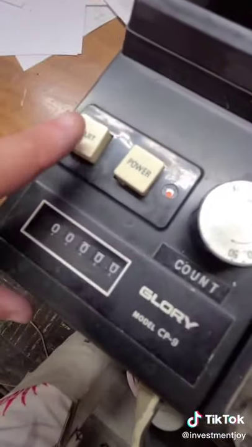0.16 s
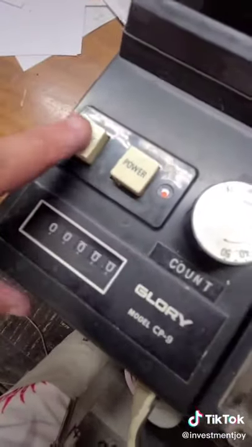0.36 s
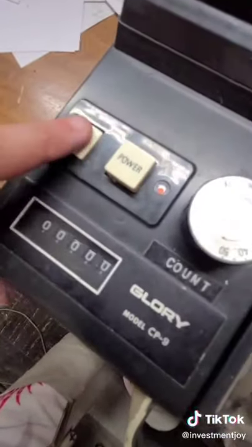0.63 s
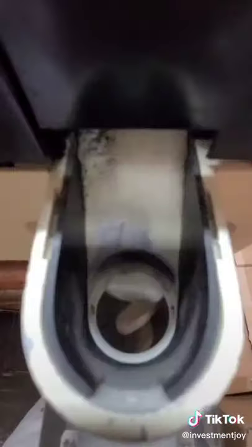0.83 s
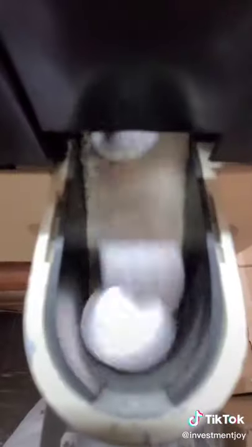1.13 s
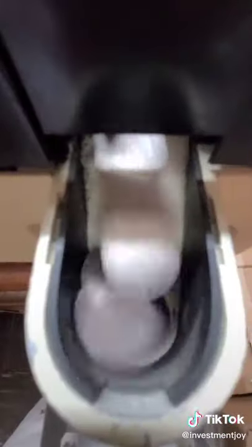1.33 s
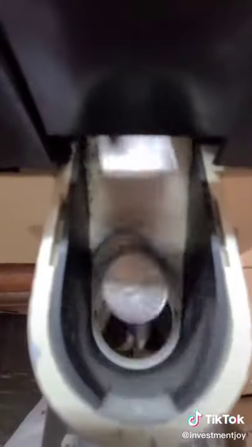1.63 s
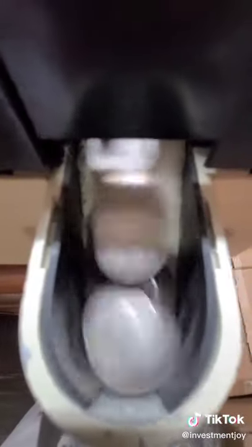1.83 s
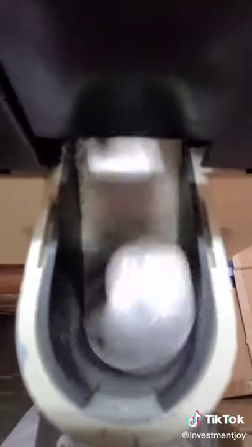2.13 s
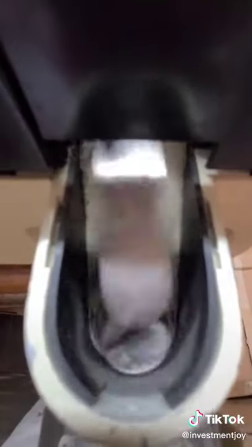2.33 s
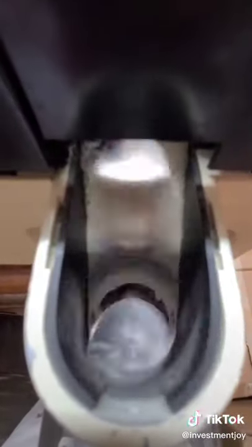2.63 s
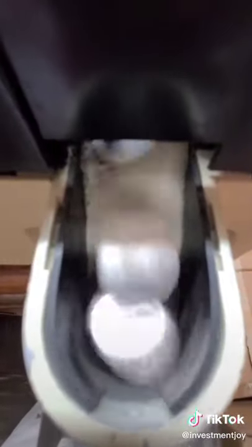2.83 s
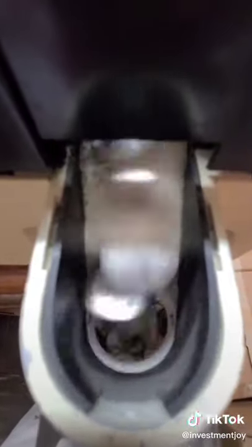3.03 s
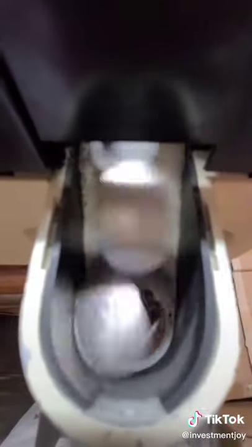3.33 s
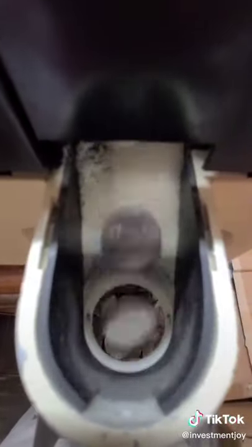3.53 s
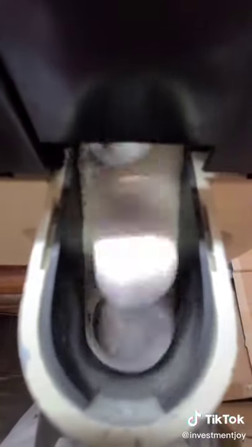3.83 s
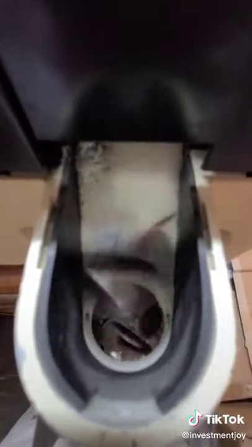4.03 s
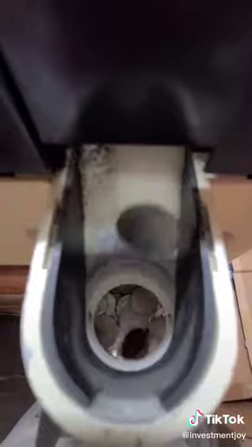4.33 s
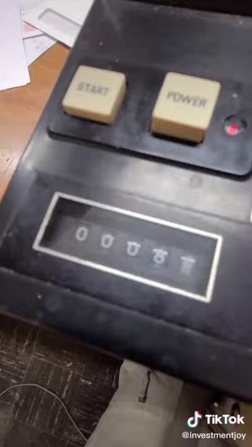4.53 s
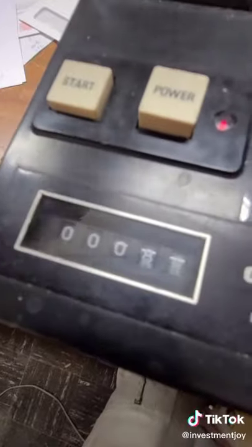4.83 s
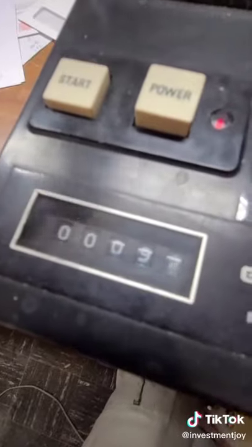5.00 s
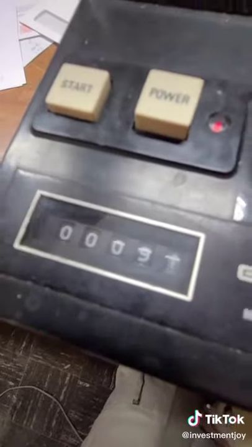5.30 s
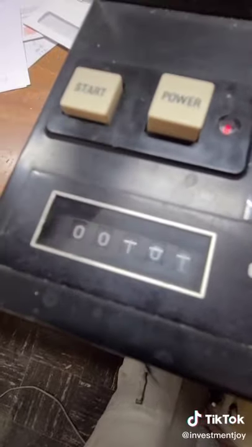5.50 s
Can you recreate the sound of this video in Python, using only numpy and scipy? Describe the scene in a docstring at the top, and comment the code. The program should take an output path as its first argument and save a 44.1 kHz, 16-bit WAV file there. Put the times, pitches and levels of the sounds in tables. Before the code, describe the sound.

Coin counter starting with a heavy clunk, followed by a dense, bright, unbroken clatter of coins, silvery ringing and quick hollow knocks.

```python
"""Quarters rattle and shimmer on a spinning disc, ring as they fly free, and knock and clink into a chute.
A button starts the coin counter: its clutch clunks, the motor growls upward, and drive rumble lies beneath.
Shaped noise makes the rattle and rumble; short-lived sine modes make the coins, chute and funnel ring;
short scattered bursts make the blows. The sound is heard from three places in turn, joined by cuts:
over the start button, close to the funnel, and over the counter dial."""
import sys
import numpy as np
from scipy import signal
from scipy.fft import rfft, irfft, next_fast_len
from scipy.io import wavfile
from scipy.ndimage import uniform_filter1d, map_coordinates

SR = 44100
rng = np.random.default_rng(int(sys.argv[2]) if len(sys.argv) > 2 else 0)


def materialize(psi):
    """Save the field psi as 16-bit PCM at rate SR to the path in sys.argv[1].

    A 1-D psi becomes a single channel; in a 2-D psi each row is a channel.
    """
    bounded = np.clip(np.atleast_2d(psi).T, -1, 1)
    quanta = np.round(bounded * 32767).astype(np.int16)
    wavfile.write(sys.argv[1], SR, quanta)


N = 249606

# All levels in the tables are set before each layer's own gain.
# Cuts to the second and third place. Each entry: time in seconds.
PLACE_CUTS = [0.727, 4.31]

# Steady churn of the heap on the disc. Each row: time in seconds, rattle level in dB.
CHURN_LEVEL = [(0.31, -77), (0.42, -45), (0.52, -39), (0.71, -43), (0.78, -55.5), (1.4, -46.5), (1.75, -53),
               (2.1, -53), (2.7, -47.5), (2.95, -47), (3.35, -54), (3.47, -47), (3.6, -50.5), (4.15, -52.5),
               (4.3, -54.5), (4.36, -50), (5.1, -48.5), (5.25, -48), (5.66, -50)]
# Rattle colour, one list per place. Each row: frequency in Hz, relative level in dB per Hz.
RATTLE_COLOURS = [
    [(710, -45), (1200, -1), (1730, -8), (2190, -6.5), (2680, -3), (7330, -7), (9270, -7.5), (12200, -6),
     (15500, -16)],
    [(710, -74), (1200, -9), (2190, -11.5), (4000, -10), (5300, -9.5), (7810, -13), (9270, -3),
     (10200, -9.5), (13600, -12), (15500, -7)],
    [(710, -55), (1200, -11.5), (1860, -14.5), (4340, -10.5), (4830, -8), (7650, -10.5), (9270, -7),
     (14200, -5.5), (15500, -9)],
]
# Stereo balance of rattle and blows, one list per place. Each row: frequency in Hz, left minus right in dB.
PLACE_BALANCE = [
    [(300, 4.5), (2500, 1.5), (6000, 9.5), (8000, 3), (12000, 0), (15000, -5)],
    [(200, -1.5), (700, -7), (2800, 0.5), (4200, 9), (7000, 8.5), (8200, 8), (11000, 8), (14000, 17.5)],
    [(200, 1.5), (900, -3.5), (1800, -1.5), (6500, 3), (8200, -3.5), (14000, -5.5)],
]
# The disc grinding under the heap. Each row: time in seconds, level in dB.
GRIND_LEVEL = [(0.31, -58), (0.5, -52), (1.8, -56), (3.1, -50), (3.3, -58), (3.6, -50.5), (4.3, -60.5),
               (4.45, -50), (5.05, -54), (5.4, -46.5), (5.66, -56)]
# Colour of the housing's grinding. Each row: frequency in Hz, relative level in dB per Hz.
HOUSING_COLOUR = [(70, -41), (170, -9.5), (260, -1.5), (345, 0), (450, 5), (620, 0.5), (900, 4), (1300, -5),
                  (2000, -5.5), (4000, -10)]
# How jostled coins start rattling, just after the blow, and settle.
STIR_RISE_S, STIR_FALL_DB_PER_S = 0.004, 139

# A quarter's two bending modes: frequency in Hz, spread between coins as a share, t60 in seconds.
UPPER_MODE = (15320, 0.0087, 0.091)
LOWER_MODE = (9290, 0.0149, 0.09)
# Steady shimmer of the whole heap. Each row: time in seconds, upper mode level in dB.
SHIMMER_LEVEL = [(0.31, -120.0), (0.41, -46), (0.5, -37.5), (0.78, -47.5), (1.4, -43.5), (1.9, -44.5),
                 (2.15, -38), (2.72, -45.5), (2.85, -40.5), (3.5, -41), (3.9, -36.5), (4.3, -50.5),
                 (4.7, -42.5), (5.25, -49), (5.4, -44), (5.66, -42)]
# Coins that fly free and ring out. Each row: start in seconds, upper mode level in dB before its envelope.
FREE_RINGS = [(0.88, -35), (1.205, -35), (1.272, -36), (1.49, -29.5), (1.655, -27.5), (1.972, -35),
              (2.057, -32.5), (2.408, -37), (2.6, -32), (2.757, -38), (3.076, -29.5), (3.184, -31),
              (3.25, -33), (3.621, -34), (3.754, -36), (3.803, -37), (3.853, -34), (3.975, -32),
              (4.061, -34), (4.577, -33), (5.024, -33), (5.524, -33)]
# How such a ring swells and is damped.
RING_RISE_S, RING_FALL_DB_PER_S = 0.0014, 216
# Lower mode at each place. Each entry: level relative to the upper mode in dB.
LOWER_MODE_LEVEL = [-8, -11.5, -10]
# Balance of the ringing. Each row, one per place: left minus right in dB for the upper, then the lower mode.
RING_BALANCE = [(14, 8.5), (29, 26), (-1, 0.54)]
# Coins singing in their lower mode as they slide. Each row: time in seconds, central pitch in Hz, level in dB.
SLIDING_SONG = [(0.72, 9530, -69), (1.0, 9260, -44), (1.5, 9620, -50), (1.65, 9320, -42.5),
                (1.98, 9320, -51), (2.09, 9580, -45), (2.5, 9170, -56), (2.76, 9470, -45), (3.2, 9260, -50),
                (4.0, 9070, -49), (4.33, 9540, -67)]

# Coins hitting chute, funnel and each other. Each row: start in seconds, knock level in dB,
# bright clink level in dB, level of the rattle stirred up in dB.
COIN_HITS = [(0.412, -47, -38, -56), (0.615, -30.5, -40, -48), (0.717, -29, -32, -43),
             (0.7468, -23.5, -29.5, -64), (0.814, -30, -32, -38.5), (0.851, -29, -33, -54),
             (0.885, -27.5, -33.5, -46), (1.045, -31.5, -31.5, -43.5), (1.1246, -26.5, -34.5, -40.5),
             (1.136, -27.5, -31, -60), (1.191, -25, -32, -49), (1.297, -34, -34.5, -57),
             (1.357, -24.5, -34.5, -61), (1.387, -37, -37, -43.5), (1.414, -36.5, -36, -51),
             (1.4419, -32, -32, -49), (1.497, -30, -36, -46.5), (1.52, -29, -41, -65),
             (1.674, -29.5, -34.5, -45.5), (1.777, -45, -34, -47), (1.807, -34.5, -31, -53),
             (1.826, -32, -39, -40.5), (1.877, -30.5, -34, -44.5), (1.9699, -32.5, -31, -49.5),
             (2.027, -33, -48, -40.5), (2.101, -41.5, -34.5, -46), (2.1947, -34.5, -41, -44),
             (2.231, -28, -35, -43), (2.284, -36.5, -33, -46), (2.293, -29.5, -32, -43),
             (2.394, -36.5, -35, -46), (2.4175, -28.5, -33, -62), (2.452, -40, -31.5, -45.5),
             (2.486, -34.5, -36, -58), (2.5945, -28, -35, -50), (2.649, -40, -38, -60),
             (2.755, -25, -42, -39), (2.857, -31, -32.5, -65), (2.882, -37, -43, -41.5),
             (3.077, -30.5, -47, -43.5), (3.132, -39.5, -41, -53), (3.1839, -32, -45, -45.5),
             (3.228, -30.5, -41, -44), (3.25, -35, -43, -51), (3.3746, -28.5, -38, -53),
             (3.384, -38, -33.5, -59), (3.532, -25, -34, -44), (3.643, -26.5, -51, -41.5),
             (3.794, -31, -49, -52), (3.801, -38, -32.5, -58), (3.844, -40, -38, -44),
             (3.896, -27, -34, -44), (3.978, -32, -35.5, -54), (4.036, -31.5, -35.5, -49),
             (4.063, -34.5, -37, -48.5), (4.116, -57, -37, -70), (4.1569, -25.5, -35, -47),
             (4.333, -35.5, -36, -42.5), (4.435, -27.5, -37, -42.5), (4.495, -28, -30, -41.5),
             (4.576, -39, -34, -43), (4.626, -38, -43, -40.5), (4.66, -38, -33.5, -53),
             (4.7666, -29.5, -33.5, -44), (4.778, -47, -36, -44.5), (4.858, -32.5, -33.5, -55),
             (4.925, -35, -31.5, -65), (5.025, -34.5, -34.5, -44), (5.079, -35, -39, -39.5),
             (5.2894, -30, -36.5, -41.5), (5.324, -45, -33, -40.5), (5.3722, -30, -36, -44),
             (5.437, -32.5, -33.5, -44), (5.524, -29.5, -41, -39.5), (5.5652, -32, -35, -46),
             (5.629, -30, -33, -46)]
# Dull knock on plastic. Each row: frequency in Hz, relative level in dB per Hz.
KNOCK_COLOUR = [(100, -55), (350, -0.5), (600, 4.5), (950, 8.5), (1700, -7.5), (3000, -1), (4500, -22.5),
                (14000, -5)]
# Clink on metal. Each row: frequency in Hz, relative level in dB per Hz.
CLINK_COLOUR = [(500, 1), (2000, -31), (4500, 1.5), (7500, 2.5), (10000, 7), (13000, 5.5), (15500, -2)]
# Changing colour of the knocks as the funnel fills and the place changes. Each row: time in seconds,
# thud near 600 Hz, around the chute's lowest mode, in dB, hard crack near 3 kHz in dB.
THUD_AND_CRACK = [(0.7, 16.5, 1), (1.6, 10, 1), (2.7, 2, 4.5), (4.2, -3, 9), (4.4, 6, -5.5),
                  (5.66, 0.5, -0.5)]
# Resonances of the chute. Each row: frequency in Hz, level in dB, t60 in seconds, left minus right in dB.
CHUTE_MODES = [(593, 1, 0.15, -9), (1278, 4.5, 0.31, 4.5), (2760, 1, 0.11, -9), (3830, -1.5, 0.16, 5),
               (4710, -4, 0.11, 3)]
# Resonances of the funnel. Each row: frequency in Hz, level in dB, t60 in seconds, left minus right in dB.
FUNNEL_MODES = [(1507, 4.5, 0.14, -22), (1670, 1.5, 0.056, -23), (3120, -2.5, 0.2, -23)]
# The funnel rings most while empty and near. Each row: time in seconds, level in dB.
FUNNEL_HOLLOWNESS = [(0.72, -1), (0.74, 2.5), (1.5, 4), (2.3, -2), (4.33, -5.5)]

# The hopper rings as the heap starts to slide. Each row: frequency in Hz, width in Hz, level in dB.
HOPPER_RESONANCES = [(337, 110, -4.5), (840, 44, 2.5), (1705, 43, 4), (2390, 71, -5.5)]
# The drive's growl as it gathers speed. Each row: time in seconds, central pitch in Hz.
GROWL_PITCH = [(0.335, 245), (0.37, 335), (0.46, 415), (0.7, 600)]
# The start button and its clutch. Each row: time in seconds, level in dB, treble relative to it in dB.
BUTTON_CONTACTS = [(0.11, -61, -30), (0.132, -59, -26), (0.298, -51.5, 2), (0.318, -27, -27),
                   (0.326, -33.5, -5)]
# Heavy clutch contact. Each row: frequency in Hz, relative level in dB per Hz.
CLUNK_COLOUR = [(50, -29), (250, 3.5), (600, 7.5), (1000, -5), (1800, -14), (3200, -20), (5000, -15),
                (12000, -36)]
# Light tap on plastic. Each row: frequency in Hz, relative level in dB per Hz.
KEYCAP_COLOUR = [(300, 8), (1200, 7), (3100, 2), (4500, -27), (14000, -17)]

# Rumble of the drive. Each row: time in seconds, level in dB.
RUMBLE_LEVEL = [(0.31, -60), (0.7, -64), (1.7, -70), (2.6, -62.5), (3.3, -68), (4.05, -63.5), (4.25, -96),
                (4.36, -59.5), (5.66, -61.5)]
# Colour of the rumble. Each row: frequency in Hz, relative level in dB per Hz.
RUMBLE_COLOUR = [(20, -27), (56, -7), (68, -2), (80, 20.5), (97, 7), (120, -30), (300, -1), (800, -46)]
# Mains hum at each place. Each entry: rms level in dB.
HUM_LEVEL = [-66, -82, -71.5]
# Colour of the quiet room. Each row: frequency in Hz, relative level in dB per Hz.
ROOM_COLOUR = [(15, -40), (44, 9), (75, -17), (101, 5.5), (130, -1), (202, -3), (543, -12.5), (15000, -53)]
# Stereo width of all coloured noise. Each row: frequency in Hz, left-right likeness from 0 to 1.
STEREO_LIKENESS = [(60, 0.97), (300, 0.83), (650, 0.46), (1300, 0.014), (15000, 0.032)]

HUM_HZ = 120
ROLLOFF_START_HZ = 15500


def rattle(grind_db=2.5, follow=0.52):
    """Hundreds of small contacts a second on the disc; the housing adds a low grinding."""
    level_db = agitation()
    bright = grain(per_second=260, t60=0.022, wash=0.8)
    # the grinding mixes these contacts with a second, sparser set
    sparse = grain(per_second=150, t60=0.022, wash=0.11)
    dull = np.sqrt((bright ** 2 + sparse ** 2) / 2)
    surge_db = np.minimum(level_db - uniform_filter1d(level_db, size=13000), 6)
    grind = amp(curves(GRIND_LEVEL)[0] + grind_db + follow * surge_db)
    where = place(np.arange(N) / SR)
    out = np.zeros((2, N))
    place_gains_db = [-1, -1.8, -2]
    for k, (colour, sides, gain_db) in enumerate(zip(RATTLE_COLOURS, PLACE_BALANCE, place_gains_db)):
        coins = patches(noise(colour, sides), depth_db=3.4)
        coins /= band(coins.mean(0), 3500, 8500).std()
        coin_rattle = coins * bright * amp(level_db + gain_db)
        grinding = dull * grind * noise(HOUSING_COLOUR, sides)
        out += (where == k) * (coin_rattle + grinding)
    return out * running()


def agitation():
    """How hard the coins rattle, in dB: the disc keeps them churning and every blow stirs them up."""
    stirs = [(s, stir_db) for s, _, _, stir_db in COIN_HITS]
    return swells(CHURN_LEVEL, stirs, STIR_RISE_S, STIR_FALL_DB_PER_S)


def grain(per_second, t60, wash):
    """The flutter of many small contacts, blurred inside the hopper; rms about 1."""
    t = np.arange(SR // 10) / SR
    impacts = contacts(per_second, scatter_db=-1.5) ** 2
    power = np.abs(signal.fftconvolve(impacts, amp(-60 * t / t60) ** 2)[:N])
    power /= np.abs(uniform_filter1d(power, size=4400)) + 1e-9
    return np.sqrt((wash + power) / (1 + wash))  # wash is steady power beside the flutter


def contacts(per_second, scatter_db):
    """Random impulses of uneven size."""
    return (rng.random(N) < per_second / SR) * amp(scatter_db * np.clip(rng.standard_normal(N), -2, 2))


def patches(x, depth_db):
    """Small contacts differ in colour, so random patches of time and pitch keep the rattle's peaks shifting."""
    z = signal.stft(x, nperseg=512)[2]
    field = uniform_filter1d(rng.standard_normal(z.shape[1:]), size=3, axis=0)
    field = uniform_filter1d(field, size=5, axis=1)
    return signal.istft(z * amp(depth_db * field / field.std()), nperseg=512)[1][:, :N]


def ringing(upper_db=1.5, flutter_db=1.5):
    """The silvery shimmer of the quarters flutters as they tumble, in two bending modes."""
    upper = swells(SHIMMER_LEVEL, FREE_RINGS, RING_RISE_S, RING_FALL_DB_PER_S)
    upper += flutter_db * wobble(per_second=40)
    lower = upper + np.array(LOWER_MODE_LEVEL)[place(np.arange(N) / SR)]
    upper_sides, lower_sides = np.transpose(RING_BALANCE)
    upper_ring = coin_mode(UPPER_MODE, upper + upper_db, upper_sides)
    return upper_ring + coin_mode(LOWER_MODE, lower, lower_sides)


def coin_mode(mode, level_db, sides_db):
    """One bending mode in many coins: each differs a little in pitch and is soon damped by its neighbours."""
    hz, spread, t60 = mode
    t = np.arange(SR // 8) / SR
    x = np.zeros((2, N))
    fade = amp(-60 * t / t60) * (1 - np.exp(-t / 0.0011))
    for when, detune, size, left, right in rng.random(size=(1500, 5)):
        # logistic scatter: 0.55 makes spread the standard deviation
        pitch = hz * (1 + spread * 0.55 * np.log((detune + 1e-3) / (1.001 - detune)))
        ring = np.sin(np.float32(2 * np.pi * (pitch * t + np.array([[left], [right]]))))
        add(x, when * N / SR, ring * (amp(-20 * size) * fade))
    # level the crowd of rings before shaping it
    x /= np.sqrt(np.abs(uniform_filter1d(np.mean(x ** 2, axis=0) / 2, size=2600)) + 1e-6)
    return x * amp(level_db) * pan(np.array(sides_db)[place(np.arange(N) / SR)]) * running()


def whine(wander_hz=45, waver_db=5.5):
    """A few sliding coins at a time ring on without a break; their close pitches wander and beat."""
    hz, level_db = curves(SLIDING_SONG)
    out = np.zeros((2, N))
    for offset_hz, db in [(0, 0), (70, -7), (-130, -8)]:
        phase = 2 * np.pi * np.cumsum(hz + offset_hz + wander_hz * wobble(per_second=49)) / SR
        tumble = np.array([wobble(per_second=20), wobble(per_second=20)])  # phase drift on each side
        out += amp(db + waver_db * wobble(per_second=30)) * np.sin(phase + tumble)
    near_funnel = place(np.arange(N) / SR) == 1
    return out * amp(level_db) * pan(RING_BALANCE[1][1]) * near_funnel


def hits(knock_db=-4.5, clink_db=0.85, steel_db=0, treble_scatter_db=2):
    """Each coin knocks on plastic and clinks on metal in the same instant, each with a colour of its own."""
    out = np.zeros((2, N))
    guide_hz = np.linspace(2500, 13500, num=36) + rng.uniform(-150, 150, size=36)
    thud_db, crack_db = curves(THUD_AND_CRACK)
    for s, db, bright_db, _ in COIN_HITS:
        now, sides = round(s * SR), PLACE_BALANCE[place(s)]
        plastic = []
        for hz, level in KNOCK_COLOUR:
            shift_db = thud_db[now] * (500 < hz < 750) + crack_db[now] * (2500 < hz < 3500)
            plastic.append((hz, level + shift_db + 1.5 * rng.standard_normal()))
        metal = [(hz, level + treble_scatter_db * rng.standard_normal()) for hz, level in CLINK_COLOUR]
        knock = blow(plastic, sides, t60=0.012, scatter_db=-19, tail_db=-35, tail_t60=0.09)
        add(out, s, amp(db + knock_db) * knock)
        clink = blow(metal, sides, t60=0.02, scatter_db=-6, tail_db=-20, tail_t60=0.07)
        add(out, s, amp(bright_db + clink_db) * clink)
        steel = clack(guide_hz, t60=0.036) * pan(along(sides, guide_hz).mean())
        add(out, s, amp(bright_db + steel_db) * steel)
    return out


def blow(spectrum, sides, t60, scatter_db, tail_db, tail_t60):
    """One contact strikes twice in quick succession; scattered reflections and a longer body tail answer."""
    t = np.arange(8192) / SR
    hz = np.fft.rfftfreq(len(t), 1 / SR)
    decay = amp(scatter_db - 60 * t / t60) + amp(tail_db - 60 * t / tail_t60)
    push = rng.standard_normal((2, len(t))) * decay
    push[:, 0] += 1
    slap = rng.integers(20, 90) + rng.integers(0, 12, size=2)  # second strike, in samples on each side
    push[[0, 1], slap] += rng.uniform(0.2, 0.5)
    # causal colour: nothing sounds before the contact
    cepstrum = irfft(np.log(amp(along(spectrum, hz)) * pan(along(sides, hz))))
    cepstrum[:, 1:] *= 2 * (t[1:] < t[-1] / 2)
    x = irfft(rfft(push) * np.exp(rfft(cepstrum)))
    return x / np.sqrt(np.mean(x[:, :180] ** 2))  # rms 1 over the first 4 ms


def clack(guide_hz, t60):
    """The steel guides ring briefly; each point of contact favours different modes."""
    t = np.arange(SR // 12) / SR
    size = amp(6 * rng.standard_normal((len(guide_hz), 1)))
    phase = 2 * np.pi * (guide_hz[:, None] * t + rng.random((2, len(guide_hz), 1)))
    return np.sum(size * np.sin(phase), axis=1) / np.linalg.norm(size) * amp(-60 * t / t60)


def chute(damping=0.38, chute_db=-3):
    """Chute and funnel resonate under the coins; their levels follow the filling and the place."""
    chute_gain = amp(chute_db + damping * curves(THUD_AND_CRACK)[0])
    funnel_gain = amp(curves(FUNNEL_HOLLOWNESS)[0])
    return ring_under_coins(CHUTE_MODES) * chute_gain + ring_under_coins(FUNNEL_MODES) * funnel_gain


def ring_under_coins(modes, knock_db=-18, slide_db=-16, lag=0.000435):
    """A body's decaying modes ring under each knock and under sliding coins; the right side lags in phase."""
    t = np.arange(SR // 4) / SR
    out = np.zeros((2, N))
    sliding = contacts(per_second=200, scatter_db=3) * amp(agitation() + slide_db) * running()
    for hz, db, t60, side_db in modes:
        drive = sliding / (1 + (hz / 2000) ** 2)  # sliding is a soft contact
        for s, hit_db, _, _ in COIN_HITS:
            add(drive, s, amp(hit_db + knock_db + rng.uniform(-3, 3, 1)))
        ring = np.sin(2 * np.pi * hz * (t - np.array([[0], [lag]])))
        ring = ring * amp(db - 60 * t / t60) * pan(side_db)
        out += signal.oaconvolve(drive[None], ring, axes=1)[:, :N]
    return out


def spin_up(scrape_db=-2, growl_db=-5.0, strain_db=-18):
    """The motor hums under strain and growls upward; the heap scrapes over the disc and rings the hopper."""
    level_db, = curves([(0.32, -40.5), (0.36, -50), (0.48, -44.5), (0.7, -43.5), (0.75, -91)])
    scrape = noise([(100, 0), (3000, 0)]) * grain(per_second=100, t60=0.022, wash=0.065)
    scrape = unit(filtered(scrape, hopper_response))
    pitch = curves(GROWL_PITCH)[0] * (1 + 0.03 * wobble(per_second=60))
    growl = np.sin(2 * np.pi * np.cumsum(pitch) / SR) * grain(per_second=100, t60=0.03, wash=0.1)
    strain = np.sin(2 * np.pi * HUM_HZ * np.arange(N) / SR)
    mix = amp(scrape_db) * scrape + amp(growl_db) * growl + amp(strain_db) * strain
    return mix * amp(level_db) * running()


def hopper_response(f):
    """Sum of the hopper's damped resonances, each peaking at its own frequency."""
    return sum(amp(db) * 1j * f * width / (hz * hz - f * f + 1j * f * width)
               for hz, width, db in HOPPER_RESONANCES)


def button(clunk_db=-7, click_db=-9):
    """The finger lands, the button clicks and the clutch clunks in: a dull body and a bright click each."""
    out = np.zeros((2, N))
    sides = PLACE_BALANCE[0]
    for s, db, treble_db in BUTTON_CONTACTS:
        colour = CLUNK_COLOUR if s > 0.31 else KEYCAP_COLOUR
        body = blow(colour, sides, t60=0.028, scatter_db=-20, tail_db=-29, tail_t60=0.25)
        add(out, s + 0.00107, amp(db + clunk_db) * body)
        click = blow(CLINK_COLOUR, sides, t60=0.017, scatter_db=-11, tail_db=-30, tail_t60=0.053)
        add(out, s + 0.001, amp(db + treble_db + click_db) * click)
    return out


def motor(waver_db=3):
    """Mains hum over a quiet room; the drive rumbles unevenly under its shifting load."""
    t = np.arange(N) / SR
    hum_gain = uniform_filter1d(amp(HUM_LEVEL)[place(t)], size=900)
    hum = np.sqrt(2) * hum_gain * np.sin(2 * np.pi * HUM_HZ * t)
    rumble = amp(curves(RUMBLE_LEVEL)[0] + waver_db * wobble(per_second=18)) * noise(RUMBLE_COLOUR)
    return hum + amp(-66.5) * noise(ROOM_COLOUR) + rumble * running()


def running():
    """0 until the clutch engages, then a quick ramp to 1."""
    return curves([(0.3, 0), (0.335, 1)])[0]


def place(s):
    """Which of the three listening places holds at time s."""
    return np.searchsorted(PLACE_CUTS, s)


def swells(steady, events, rise_s, fall_db_per_s):
    """Level in dB of a steady bed plus events (s, dB) that each rise quickly and die away."""
    t = np.arange(SR // 2) / SR
    power = amp(curves(steady)[0]) ** 2
    shape = (1 - np.exp(-t / rise_s)) * amp(-fall_db_per_s * t)
    for s, db in events:
        add(power, s, (amp(db) * shape) ** 2)
    return 10 * np.log10(power)


def wobble(per_second):
    """A smooth random curve of about rms 1."""
    knots = rng.standard_normal(size=1024)
    return map_coordinates(knots, [np.arange(N) * per_second / SR], mode="wrap")


def noise(spectrum, sides=((1, 0),), size=N):
    """Coloured stereo noise of rms 1 in the middle, alike on both sides in the bass."""
    def mid_side_gains(hz):
        turn = np.arccos(np.clip(along(STEREO_LIKENESS, hz), -1, 1)) / 2
        return amp(along(spectrum, hz)) * [np.cos(turn), np.sin(turn)]
    mid, side = filtered(rng.standard_normal((2, size)), mid_side_gains)
    stereo = np.array([mid + side, mid - side])
    return unit(filtered(stereo, lambda hz: pan(along(sides, hz))))


def filtered(x, response):
    """x times a response of frequency."""
    m = next_fast_len(x.shape[-1] + 8192)
    return irfft(rfft(x, m) * response(np.fft.rfftfreq(m, 1 / SR)), m)[..., :x.shape[-1]]


def band(x, lo, hi):
    """The part of x between two frequencies in Hz."""
    return filtered(x, lambda hz: (hz >= lo) & (hz < hi))


def pan(db):
    """Left and right gains for a level difference."""
    gains = np.array([amp(np.atleast_1d(db) / 2), amp(-np.atleast_1d(db) / 2)])
    return gains / np.sqrt(np.mean(gains ** 2, axis=0))


def add(track, s, sound):
    """Mix a sound into the track at time s, cut off at the track's end."""
    room_left = track[..., max(round(s * SR), 0):][..., :sound.shape[-1]]
    room_left += sound[..., :room_left.shape[-1]]


def curves(rows):
    """One value per sample for each column after the time."""
    s, *cols = np.transpose(rows)
    return [np.interp(np.arange(N) / SR, s, c) for c in cols]


def along(points, hz):
    """Read (Hz, value) points on a log frequency axis."""
    f, v = np.transpose(points)
    return np.interp(np.log(hz + 1), np.log(f + 1), v)


def unit(x):
    """Scale a stereo sound so that its middle has rms 1."""
    return x / np.sqrt(np.mean(x.mean(0) ** 2) + 1e-20)


def amp(db):
    """Amplitude factor for a level in dB."""
    return 10 ** (np.asarray(db) / 20)


def scene():
    """Everything together; the sound dips briefly at the first cut."""
    dip_db, = curves([(0.724, 0), (0.727, -16), (0.733, -16), (0.736, 0)])
    coins = rattle() + spin_up() + ringing() + whine() + hits() + chute()
    return (coins + button() + motor()) * amp(dip_db)


def record(dry):
    """The extreme treble falls away steeply, by 1 dB every 12 Hz down to -100 dB."""
    return filtered(dry, lambda hz: amp(-np.clip((hz - ROLLOFF_START_HZ) / 12, 0, 100)))


dry = scene()
out = record(dry)
materialize(out)
```